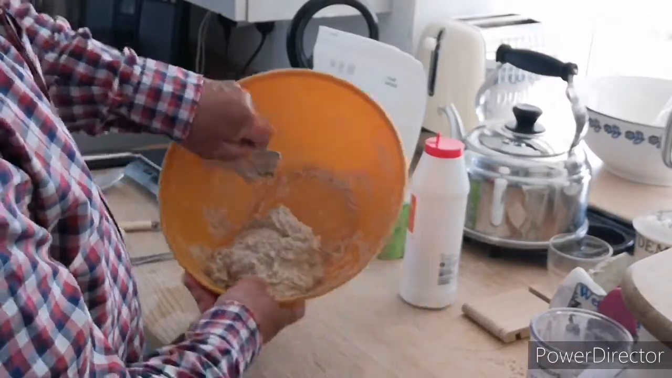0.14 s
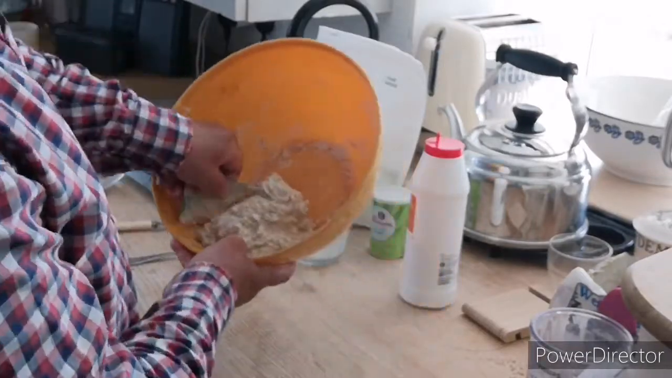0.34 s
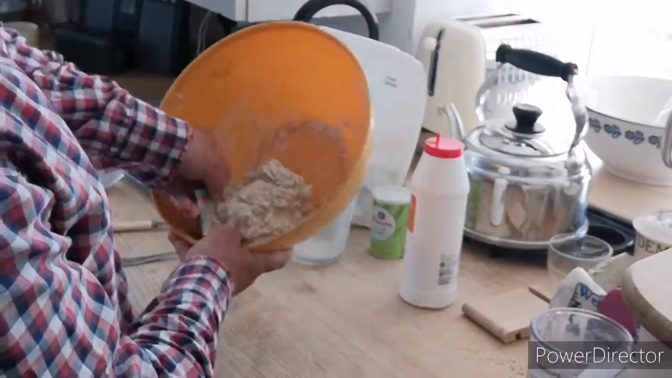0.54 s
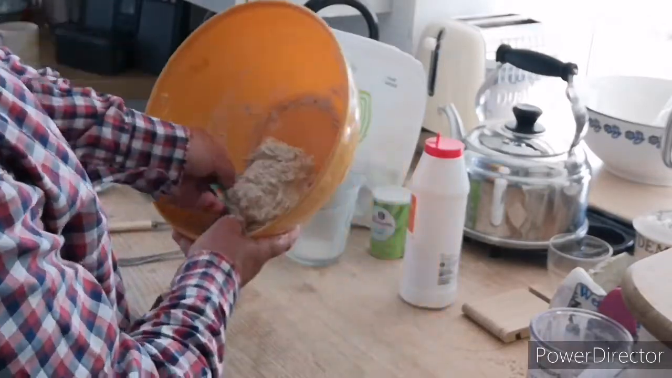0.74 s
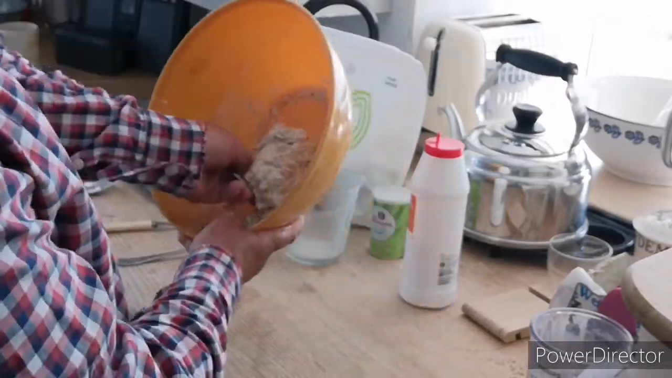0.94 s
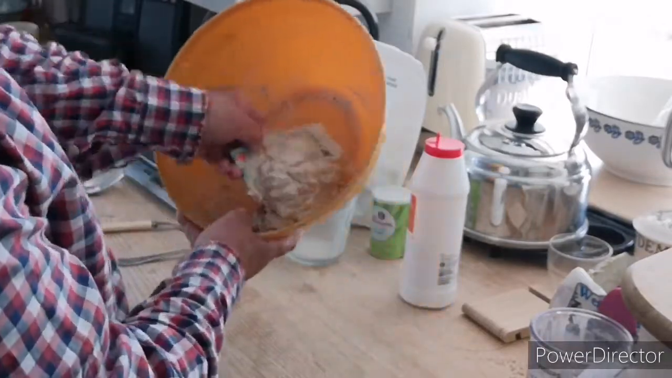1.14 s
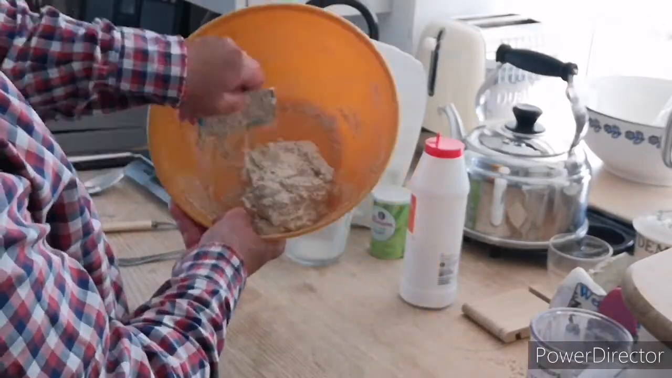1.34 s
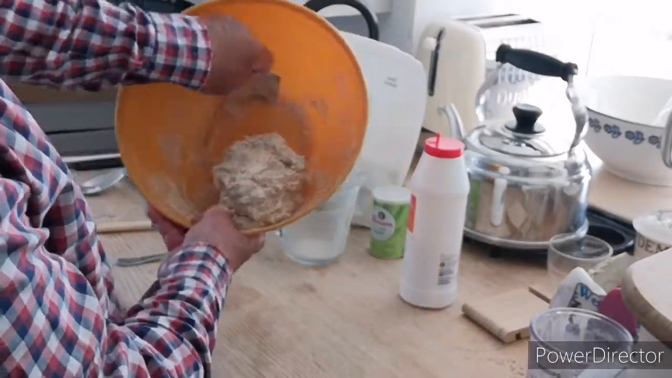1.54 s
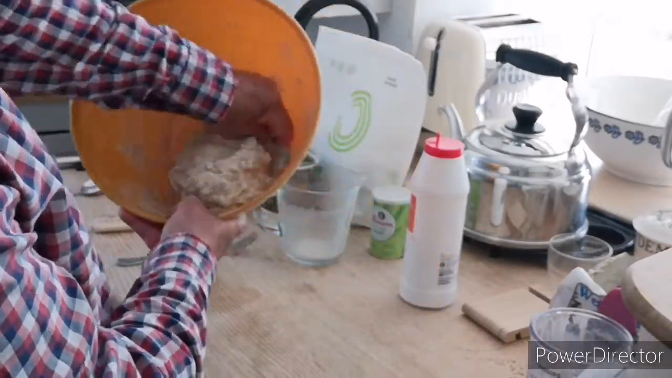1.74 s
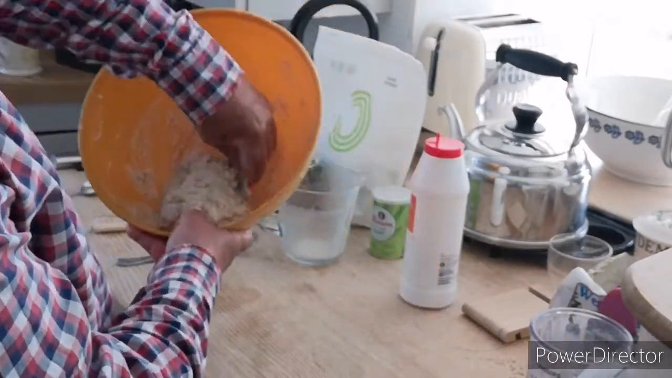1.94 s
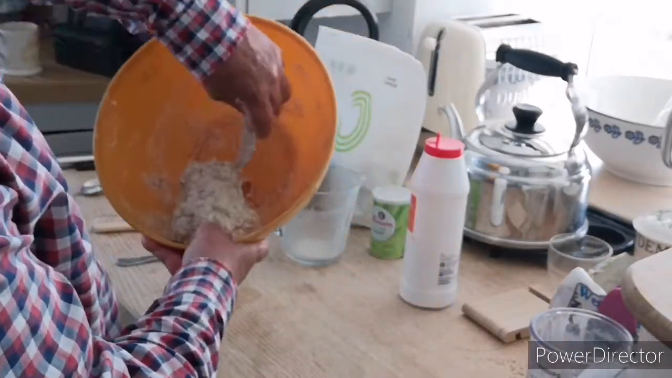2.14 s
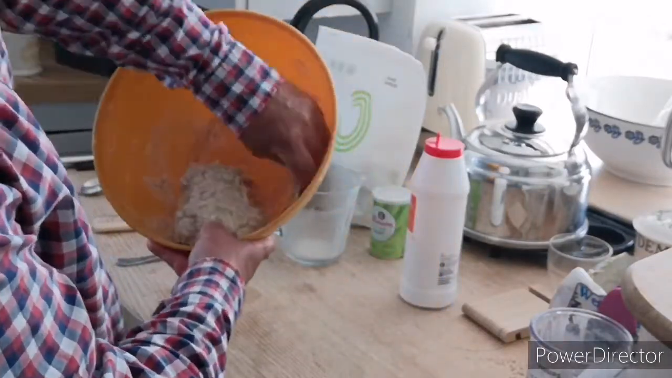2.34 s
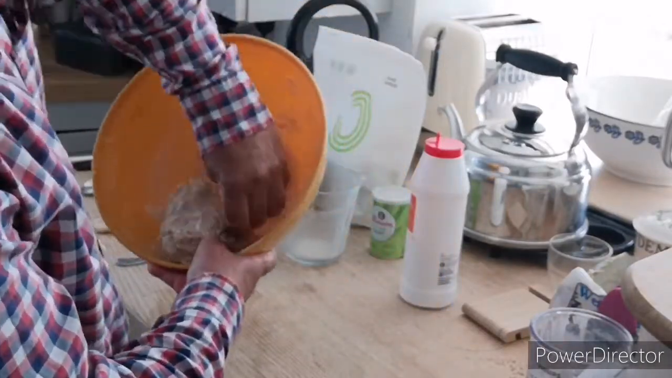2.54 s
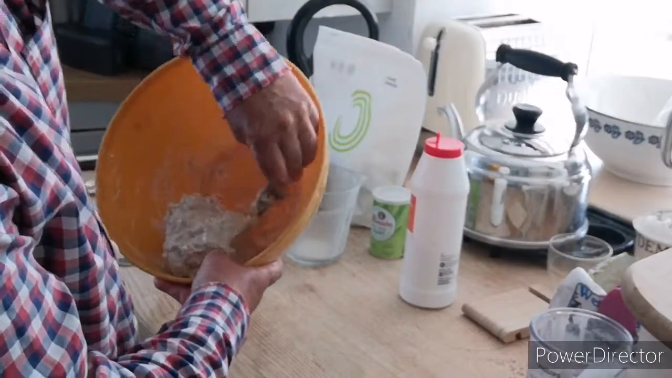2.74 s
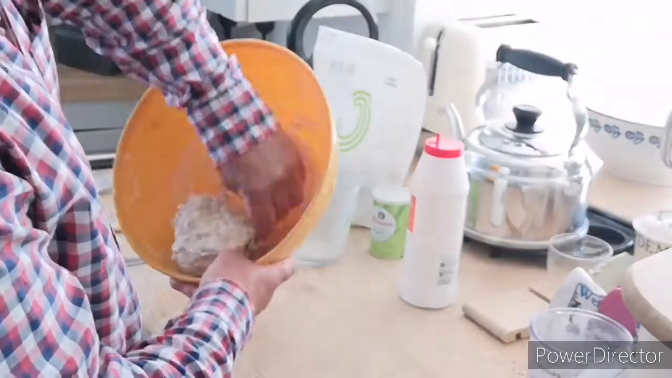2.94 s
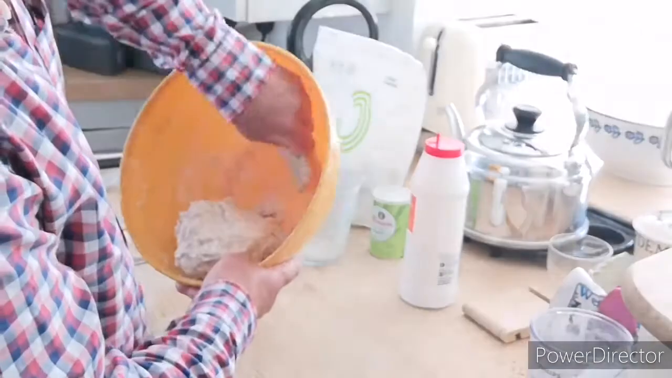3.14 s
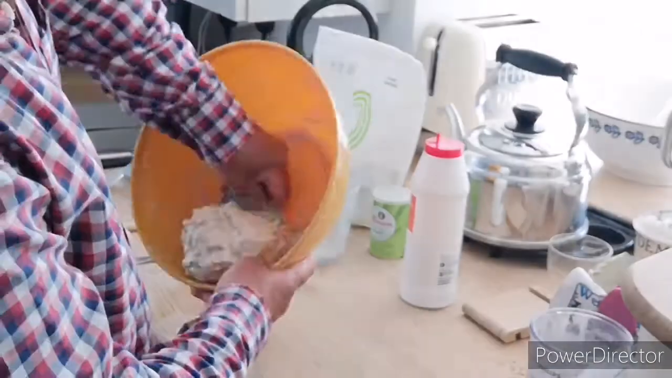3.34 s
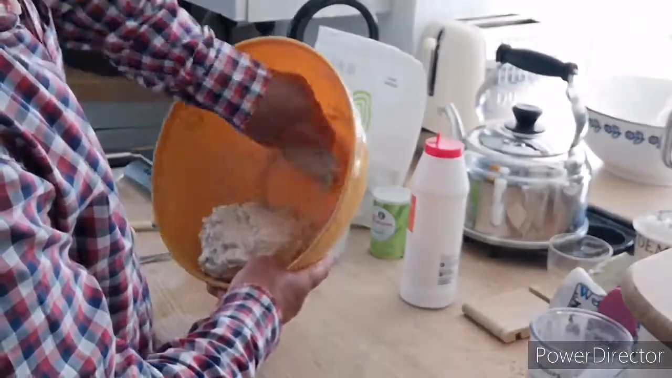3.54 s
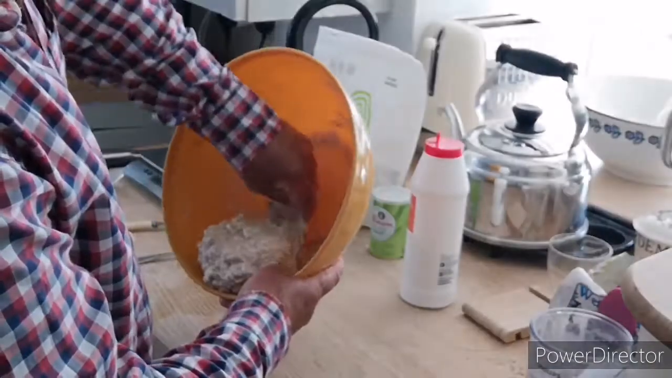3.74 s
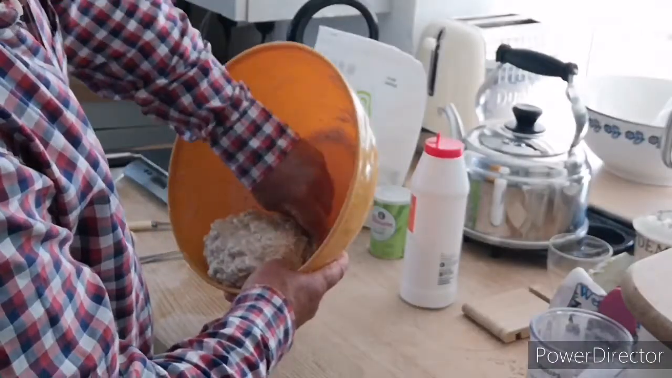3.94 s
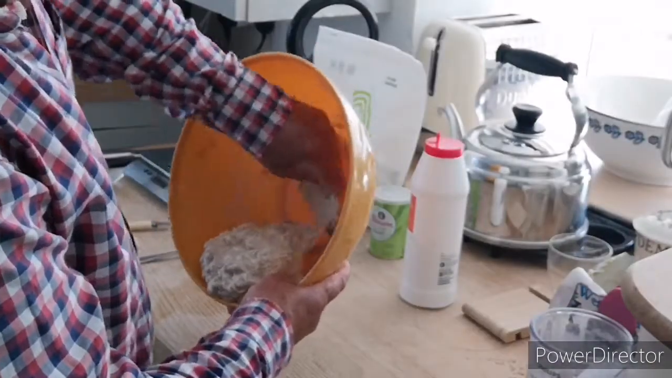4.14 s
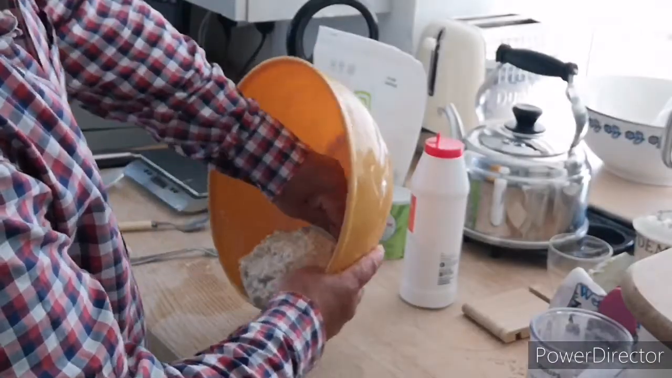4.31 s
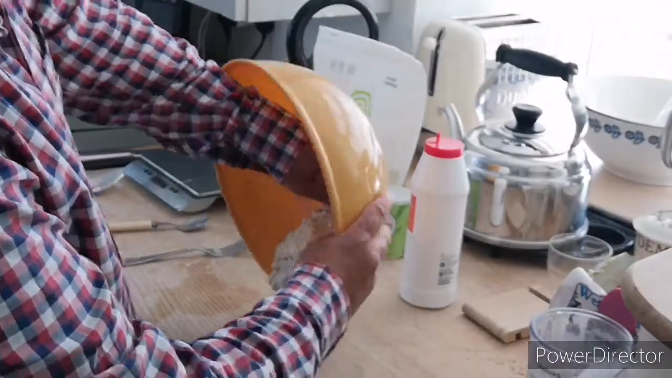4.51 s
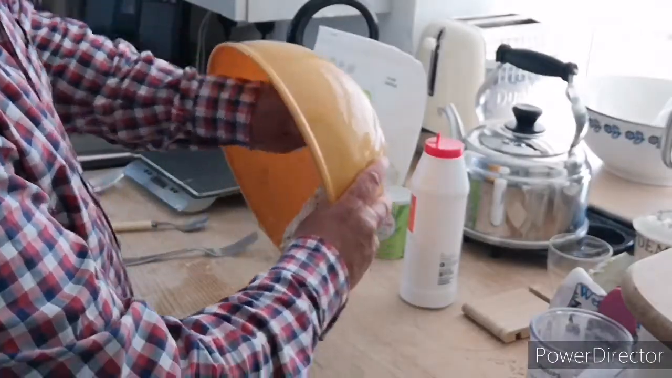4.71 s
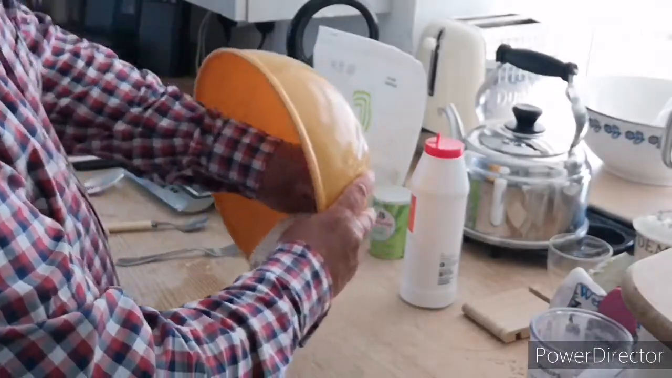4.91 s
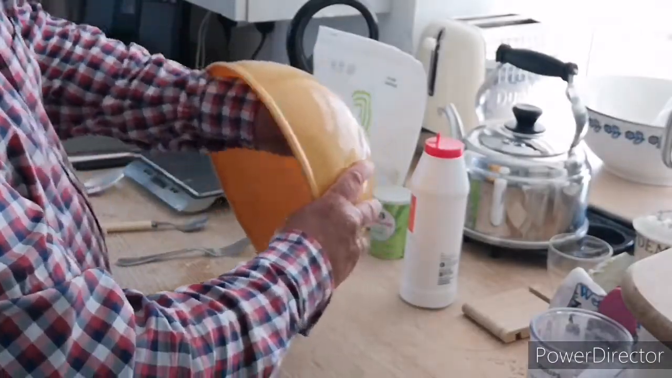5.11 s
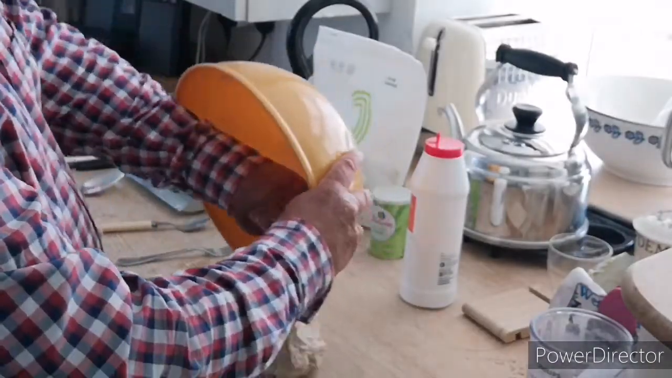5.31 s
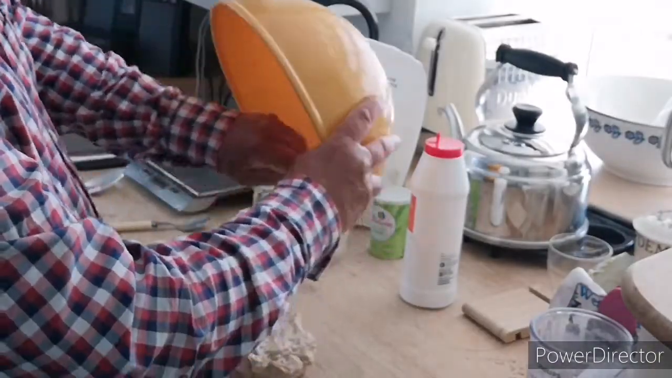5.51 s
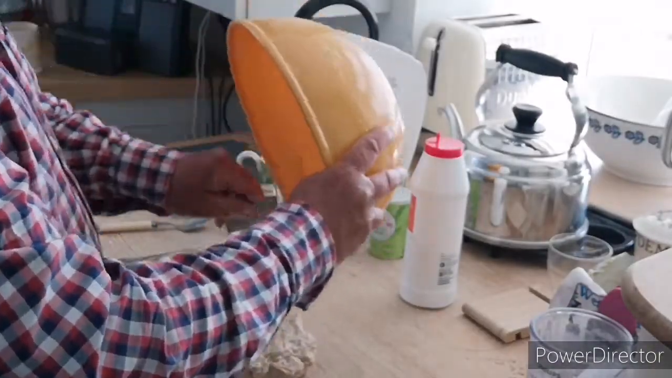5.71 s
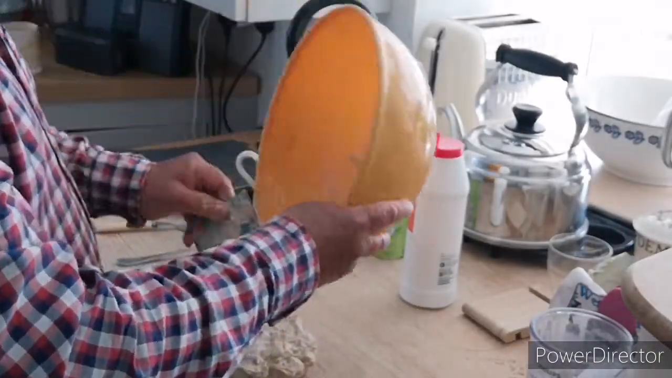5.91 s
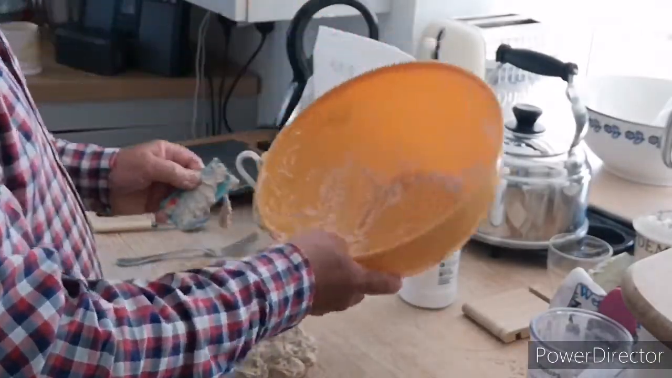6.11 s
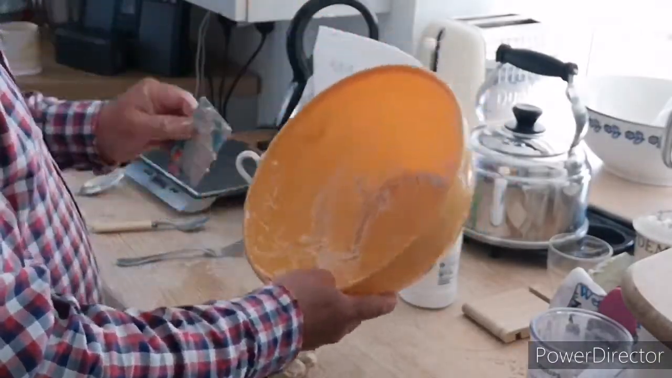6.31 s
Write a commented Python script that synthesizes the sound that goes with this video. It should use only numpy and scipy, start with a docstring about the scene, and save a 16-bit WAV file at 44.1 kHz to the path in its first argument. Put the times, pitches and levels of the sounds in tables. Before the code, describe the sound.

A plastic scraper scrapes sticky dough from a plastic bowl in short, uneven strokes with light taps, over a low kitchen hum.

```python
"""A small kitchen, where a plastic scraper clears sticky dough from a hand-held plastic bowl.
Each stroke is a dense run of tiny slips that rings the blade and the hollow of the bowl, hisses at the
edge and draws a soft boom from the wall. The blade often taps as it lands or catches; dough ticks as it
lets go, and a few thin chirps slip in. Underneath, the room hums and moved air nudges the microphone."""
import sys
import numpy as np
from scipy import signal
from scipy.fft import rfft, irfft, next_fast_len
from scipy.io import wavfile
from scipy.ndimage import uniform_filter1d, map_coordinates

SR = 44100
rng = np.random.default_rng(int(sys.argv[2]) if len(sys.argv) > 2 else 0)


def unload_wav(signal):
    """Save mono or channel-first audio to the path in sys.argv[1] as 16-bit WAV at rate SR, clipped to [-1, 1]."""
    wavfile.write(
        sys.argv[1],
        SR,
        np.round(np.clip(np.atleast_2d(signal).T, -1, 1) * 32767).astype(np.int16),
    )


N = 284797
TIME = np.arange(N) / SR
FFT_SIZE = next_fast_len(N + SR)
HZ = np.fft.rfftfreq(FFT_SIZE, 1 / SR)

# Scraper strokes, levels relative: (start [s], speed-up [s], slow-down [s], bite [dB], blade ring [dB],
# edge hiss [dB], hollow over blade [dB], hollow pitch [ratio], blade pitch [ratio], direct path [dB])
STROKES = [(0, 0.013, 0.13, -45.5, -54, -59, -9, 1.03, 1.08, -9),
           (.3, .12, 0.081, -41, -37.5, -48.5, -28.5, 0.88, 1.153, -12),
           (.55, 0.0074, 0.18, -55.5, -67, -69, -9, 0.86, 1.06, -14),
           (.825, 0.015, 0.043, -52, -62, -67, -5.5, 1.12, 1.14, -17),
           (1.655, .12, 0.12, -33, -38, -41, -8.5, 1.43, 1.1, -5.5),
           (2.406, 0.11, 0.13, -38.5, -48, -54.5, -24, 0.92, 1.09, -7),
           (2.97, 0.013, 0.078, -36.5, -40.5, -46.5, -16.5, 1.04, 1.09, -14.5),
           (3.211, 0.05, 0.053, -55, -54.5, -81, 1, 1.07, 1, -5.5),
           (3.232, 0.1, 0.15, -66, -42, -42, -8.5, 1.02, 1.04, -8),
           (3.652, 0.071, 0.12, -53, -41.5, -41, -10.5, 1.035, 1.08, -2),
           (3.982, 0.052, 0.13, -49.5, -42.5, -43.5, -7, 1, 0.99, -2.5),
           (4.284, 0.045, .11, -51, -41.5, -45, -13.5, 0.985, 1.13, -11.5),
           (4.862, 0.069, 0.092, -44, -35.5, -46, -30.5, 0.9, 1.123, -12.5),
           (5.189, 0.038, 0.061, -67, -58, -82, -19, 1.75, 0.98, -2),
           (5.268, 0.065, 0.12, -45, -39.5, -50.5, -15.5, 2.03, 1.1, -10),
           (5.564, 0.033, 0.084, -43, -43.5, -56.5, -6.5, 1.87, 1, -22.5),
           (5.958, 0.043, 0.047, -57, -58, -90, -16, 1.04, 1.1, -27)]
# Thin chirps: (time [s], length [s], pitch [Hz], level [dB])
CHIRPS = [(0, 0.1, 4650, -59), (2.881, 0.071, 5900, -70), (4.168, .095, 5560, -59.5)]
# The blade strikes or catches, levels relative: (time [s], blade ring [dB], hollow [dB], crack [dB])
BLADE_TAPS = [(.300, -46, -73, -47), (0.357, -46, -69, -51), (0.381, -39.5, -62, -53),
              (0.431, -43, -77, -47), (.821, -40.5, -50, -47.5), (1.650, -26, -33.5, -28.5),
              (2.405, -47, -75, -56), (2.967, -34, -40, -38.5), (3.994, -67, -43, -62.5),
              (4.903, -32.5, -73, -61), (4.937, -29.5, -55.5, -39), (5.294, -35.5, -76, -44.5),
              (5.335, -35, -70, -47.5), (5.563, -33, -40.5, -54), (5.958, -51, -60, -68.5)]
# Puffs of moved air: (peak time [s], half width [s], relative level [dB])
AIR_PUFFS = [(.42, 0.068, -53), (3.75, 0.063, -42), (4.13, 0.09, -46.5), (5.08, 0.11, -41),
             (5.33, 0.12, -42.5), (6.45, 0.097, -55)]
# Dough lets go: (time [s], relative level [dB])
DOUGH_TICKS = [(0.5511, -60), (1.2491, -55), (2.2657, -61), (2.7008, -50.5), (2.8784, -63), (3.1492, -53),
               (3.5244, -48), (3.919, -46), (4.58, -51.5), (5.118, -57)]

# Tone colour of each source: (frequency [Hz], relative level [dB])
BLADE_SPECTRUM = [(500, -36.5), (900, -17.5), (1250, -8.5), (1500, -0.5), (1750, 7), (2100, 0.5),
                  (2550, -2), (3000, -10.5), (3500, -10), (4700, -16.5), (6500, -37), (10000, -103)]
HOLLOW_SPECTRUM = [(150, -25.5), (280, -8.5), (400, -15.5), (530, 6), (650, -6.5), (950, -1), (1400, -5),
                   (2400, -37.5)]
HISS_SPECTRUM = [(1650, -48.5), (2800, 3), (3470, -4.5), (4360, -5), (5570, -4.5), (6240, -8), (8870, -9),
                 (14400, -23.5), (15500, -34)]
ROOM_SPECTRUM = [(30, -39), (60, -15.5), (80, -1.5), (105, -27.5), (145, -7), (185, -18), (290, -12),
                 (560, -30.5), (1100, -30), (1900, -32.5), (5000, -41), (15500, -50.5)]
CRACK_SPECTRUM = [(1760, -16), (3000, -22), (3570, -7.5), (4320, -5.5), (5650, -4.5), (6340, -15),
                  (6960, -15.5), (15000, -42)]
AIR_SPECTRUM = [(12, -12.5), (28, -18), (46, -7.5), (62, -24), (250, -48)]
TICK_SPECTRUM = [(1000, -12), (4000, -21), (8000, -2), (15000, -18)]
# Low modes of the bowl's wall and of the room's drone: (frequency [Hz], width [Hz], relative level [dB])
WALL_MODES = [(139, 12.6, 1.5), (275, 18.4, -11)]
DRONE_MODES = [(138.3, 9.1, 0)]
# The kitchen's reverb: (frequency [Hz], time to fall 60 dB [s])
KITCHEN_DECAY = [(150, 0.81), (700, 0.39), (2000, 0.34), (6000, 0.38), (14000, 0.26)]
# Colour mismatch of the two microphones: (frequency [Hz], left over right [dB])
MIC_BALANCE = [(600, -2), (1300, 0.5), (2400, 0.1), (4500, -0.3), (8000, -3.5), (13000, 3)]


def amp(db):
    """Decibels to gain."""
    return 10 ** (np.asarray(db) / 20)


def unit(x):
    """Scale to rms 1."""
    return x / np.sqrt(np.mean(np.abs(x) ** 2) + 1e-20)


def along(points, hz):
    """Read a curve of (Hz, value) points on a log frequency axis."""
    freqs, values = np.transpose(points)
    return np.interp(np.log(hz + 1), np.log(freqs + 1), values)


def filtered(x, response):
    """Play x through a frequency response."""
    return irfft(rfft(x, FFT_SIZE) * response, FFT_SIZE)[..., :N]


def resonances(modes):
    """Frequency response of a few damped modes."""
    return sum(amp(db) * 1j * HZ * width / (hz * hz - HZ ** 2 + 1j * HZ * width)
               for hz, width, db in modes)


def ring(spectrum, pitch=1, size=2048):
    """A body's answer to one jerk: a minimum-phase impulse response of energy 1."""
    hz = np.fft.rfftfreq(size, 1 / SR)
    gain = amp(np.maximum(along(spectrum, hz / pitch), -70))
    cepstrum = irfft(np.log(gain))
    cepstrum[1:size // 2] *= 2
    cepstrum[size // 2 + 1:] = 0
    response = irfft(np.exp(rfft(cepstrum)))
    return response / np.linalg.norm(response)


def wobble(rate, n):
    """A smooth random curve with rate knots a second."""
    knots = rng.standard_normal(int(n * rate / SR) + 4)
    return map_coordinates(knots, [np.arange(n) * rate / SR])


def add(out, time, x):
    """Mix x into out at this time."""
    start = max(round(time * SR), 0)
    out[:, start:start + x.shape[1]] += x[:, :N - start]


def pose(time):
    """Hollow pitch, blade pitch and direct path of the nearest stroke."""
    away = [max(start - time, time - start - rise_s - fall_s, 0) for start, rise_s, fall_s, *_ in STROKES]
    return STROKES[np.argmin(away)][-3:]


def kitchen(x, time, near_db=0, near_t60=0.045, room_db=-5):
    """Place x in stereo: direct path, quick echoes off bowl and counter, and the room's tail."""
    hz, t, noise = signal.stft(rng.standard_normal((2, SR // 2)), SR, nperseg=256)
    decay = amp(-60 * t / along(KITCHEN_DECAY, hz)[:, None])
    _, tail = signal.istft(noise * decay, SR, nperseg=256)
    t = np.arange(tail.shape[1]) / SR
    near = rng.standard_normal(tail.shape) * amp(-60 * t / near_t60) * (t > .001)
    paths = amp(near_db) * near / np.linalg.norm(near[0]) + amp(room_db) * tail / np.linalg.norm(tail[0])
    *_, direct_db = pose(time)
    paths[:, 0] += amp(direct_db)
    return signal.fftconvolve(x[None], paths / np.linalg.norm(paths.mean(0)), axes=1)


def stroke_gains(rise_s, fall_s, bite_db, ring_db, hiss_db, bite_db_per_s=194):
    """Ring and hiss envelopes: the blade bites and chatters briefly, speeds up, then slows to rest."""
    t = np.arange(0, rise_s + fall_s, 1 / SR)
    speed = np.abs(np.sin(np.pi * np.interp(t, [0, rise_s, rise_s + fall_s], [0, .5, 1])))
    bite = amp(bite_db - bite_db_per_s * t)
    ring_gain = np.hypot(bite, amp(ring_db) * speed ** 1.05)
    hiss_gain = np.hypot(amp(-14) * bite, amp(hiss_db) * speed ** 2.2)
    return ring_gain, hiss_gain


def slips(n, per_second, spread_db):
    """Stick-slip: tiny jerks at random moments and of very unequal size."""
    sizes = amp(spread_db * np.clip(rng.standard_normal(n), -2, 2))
    return unit(sizes * rng.choice([-1, 1], n) * (rng.random(n) < per_second / SR))


def scrapes(blade_db=-2, judder_db=0.4, bend=0.07, shade=0.015):
    """Coarse slips ring the blade, fine ones the hollow and the hissing edge; the hand judders on all."""
    out = np.zeros((2, N))
    for start, *gesture, hollow_db, hollow_pitch, blade_pitch, direct_db in STROKES:
        ring_gain, hiss_gain = stroke_gains(*gesture)
        n = len(ring_gain)
        edge = ring(HISS_SPECTRUM, np.exp(shade * min(direct_db + 4, 3)))  # duller behind the bowl's wall
        pressure = amp(judder_db * wobble(116, n))
        # The blade bends and travels: each leg has its own pitch and echoes and crossfades into the next.
        for leg in np.eye(2 + n // (SR // 10)):
            fade = np.sqrt(np.interp(np.arange(n), np.linspace(0, n - 1, len(leg)), leg))
            coarse = pressure * fade * slips(n, per_second=1600, spread_db=3)
            fine = pressure * fade * slips(n, per_second=6000, spread_db=6.5)
            detune = np.exp(bend * rng.standard_normal())
            blade = ring(BLADE_SPECTRUM, blade_pitch * detune)
            hollow = ring(HOLLOW_SPECTRUM, hollow_pitch * detune)
            sound = signal.fftconvolve(amp(blade_db) * ring_gain * coarse, blade)
            sound += signal.fftconvolve(amp(hollow_db) * ring_gain * fine, hollow)
            sound += signal.fftconvolve(hiss_gain * (fine + 0.22 * coarse), edge)
            add(out, start, kitchen(sound, start))
    return out


def wall_boom(scraping, gain_db=-34, lag_s=0.028):
    """The blade's drag flexes the whole bowl: a soft boom that swells more slowly than the scrape."""
    coarse = filtered(scraping, amp(along(BLADE_SPECTRUM, HZ)))
    drag = np.sqrt(uniform_filter1d(np.mean(coarse ** 2, 0), SR // 20).clip(0))
    push = np.sqrt(np.interp(TIME - lag_s, TIME, drag)) * rng.standard_normal(N)
    wall = unit(resonances(WALL_MODES) / (1 + (HZ / 500) ** 2))
    return amp(gain_db) * filtered(push, wall)


def chirps(waver=0.032):
    """Faint, thin chirps, made hoarse by a fast waver in pitch."""
    out = np.zeros((2, N))
    for time, length, hz, db in CHIRPS:
        n = int(length * SR)
        phase = 2 * np.pi * np.cumsum(hz * (1 + waver * wobble(897, n))) / SR
        add(out, time, kitchen(amp(db) * np.hanning(n) * np.sin(phase), time))
    return out


def room_tone(level_db=-60, widen_hz=300):
    """A bed of room noise, centred in the bass and wide above it."""
    width = np.pi / 4 * HZ ** 2 / (HZ ** 2 + widen_hz ** 2)
    colour = amp(along(ROOM_SPECTRUM, HZ))
    mid, side = filtered(rng.standard_normal((2, N)), colour * [np.cos(width), np.sin(width)])
    return amp(level_db) * unit(np.array([mid + side, mid - side]))


def hum(drone_db=-58, motor_db=-57, motor_hz=46.7):
    """The room's low drone over the slightly wavering tone of a fridge motor."""
    drone = unit(filtered(rng.standard_normal(N), resonances(DRONE_MODES) / (1 + (HZ / 220) ** 4)))
    motor = np.sin(2 * np.pi * motor_hz * TIME + .5 * wobble(4.33, N))
    return amp(drone_db) * drone + amp(motor_db) * motor


def blade_taps(gain_db=25):
    """A single jerk of the blade rings blade and hollow, with a hard crack on top."""
    out = np.zeros((2, N))
    for time, *levels_db in BLADE_TAPS:
        hollow_pitch, blade_pitch, _ = pose(time)
        parts = [ring(BLADE_SPECTRUM, blade_pitch), ring(HOLLOW_SPECTRUM, hollow_pitch),
                 ring(CRACK_SPECTRUM)]
        tap = amp(gain_db) * amp(levels_db) @ np.array(parts)
        add(out, time, kitchen(tap, time, near_db=-3.5, near_t60=0.037, room_db=-6))
    return out


def air_puffs(gain_db=-1, still_db=-58):
    """Moved air nudges the microphone: a faint rumble that swells softly with each puff."""
    rumble = unit(filtered(rng.standard_normal(N), amp(along(AIR_SPECTRUM, HZ)) * (HZ < 400)))
    swells = sum(amp(db) * np.exp(-((TIME - time) / width) ** 2) for time, width, db in AIR_PUFFS)
    return amp(gain_db) * rumble * (amp(still_db) + swells)


def dough_ticks(gain_db=10):
    """Strands of dough part with a thin click."""
    out = np.zeros((2, N))
    for time, db in DOUGH_TICKS:
        click = amp(db + gain_db) * ring(TICK_SPECTRUM)
        add(out, time, kitchen(click, time, near_t60=.05, room_db=-2))
    return out


def scene():
    """The work on the bowl up front, the kitchen's low bed behind it."""
    scraping = scrapes()
    foreground = scraping + blade_taps() + dough_ticks() + chirps() + wall_boom(scraping)
    return foreground + room_tone() + hum() + air_puffs()


def record(dry, top_hz=15450):
    """Two microphones, slightly unlike above the bass, with a steep cut at the top."""
    lean_db = along([(250, 0)] + MIC_BALANCE, HZ) / 2
    return filtered(dry, amp([lean_db, -lean_db]) * (HZ < top_hz))


dry = scene()
out = record(dry)
unload_wav(out)
```